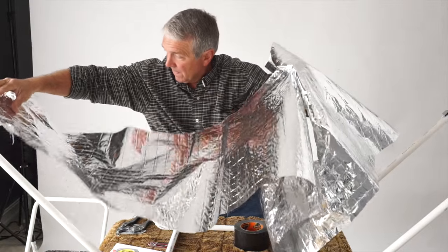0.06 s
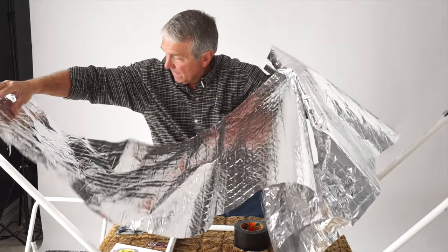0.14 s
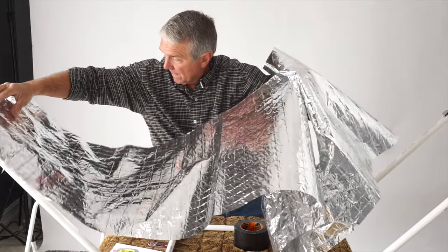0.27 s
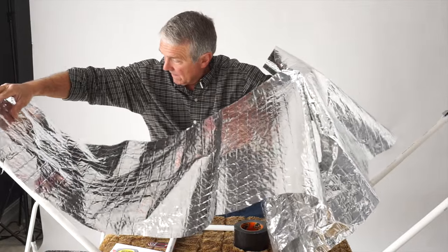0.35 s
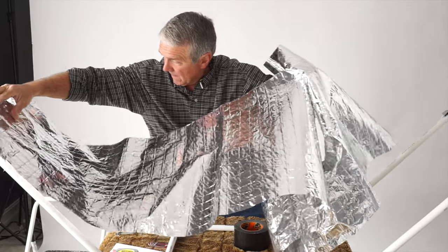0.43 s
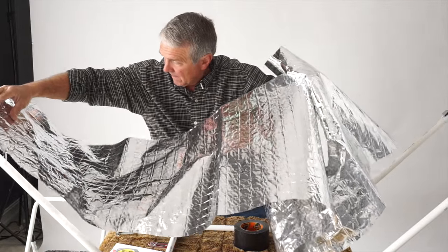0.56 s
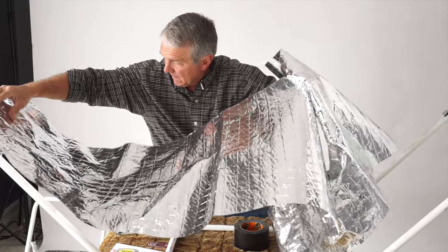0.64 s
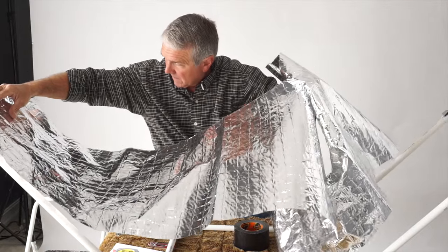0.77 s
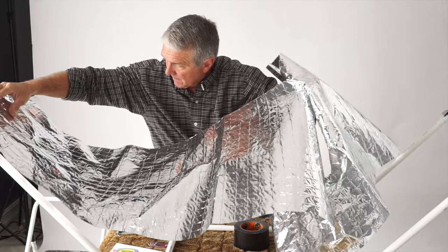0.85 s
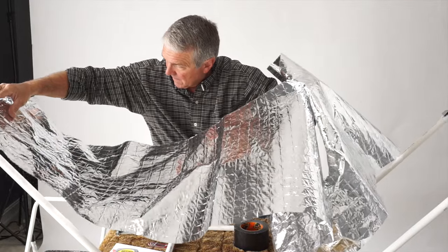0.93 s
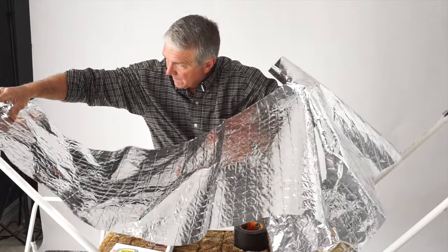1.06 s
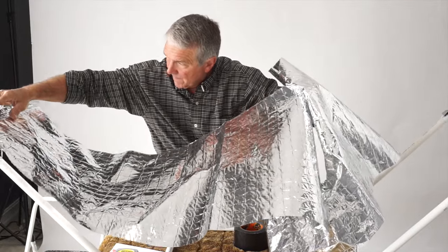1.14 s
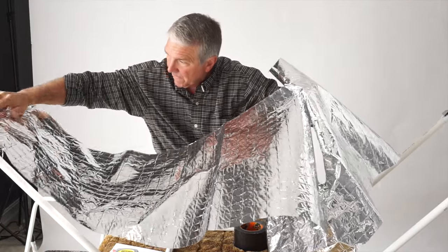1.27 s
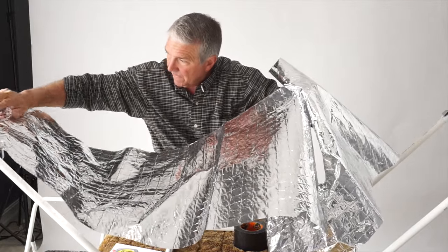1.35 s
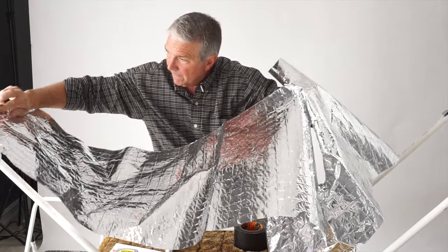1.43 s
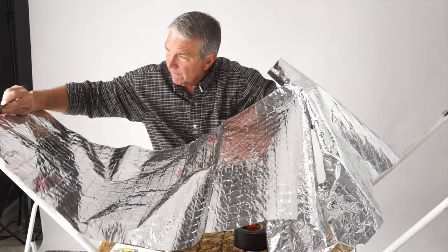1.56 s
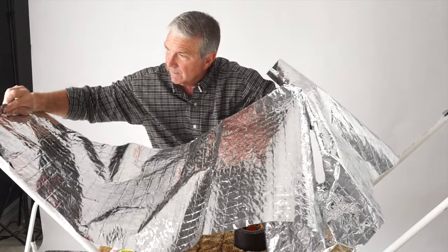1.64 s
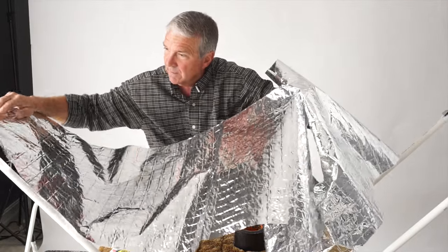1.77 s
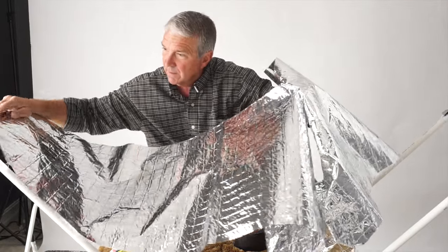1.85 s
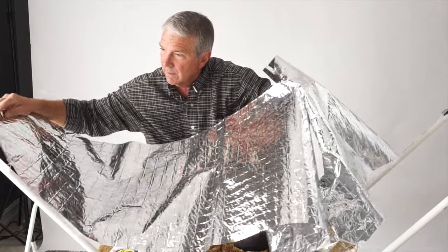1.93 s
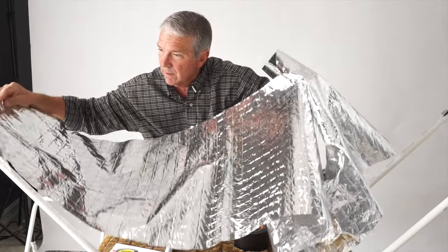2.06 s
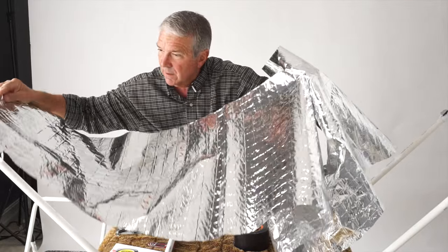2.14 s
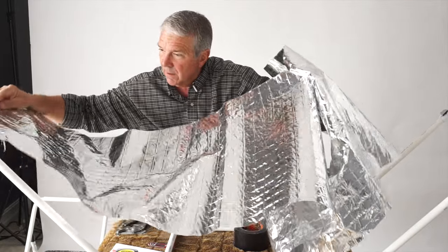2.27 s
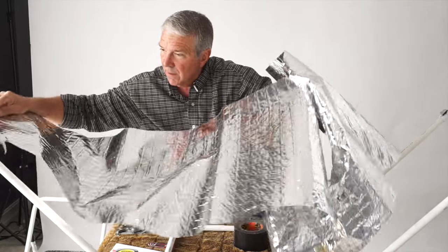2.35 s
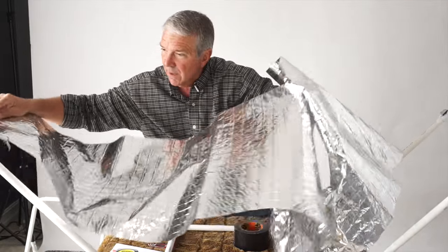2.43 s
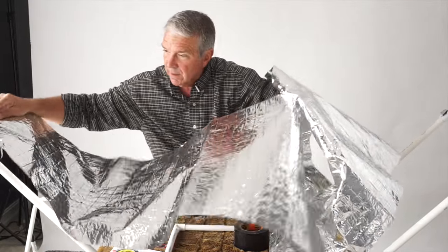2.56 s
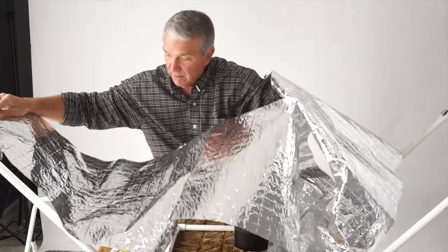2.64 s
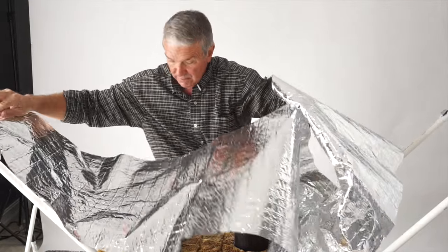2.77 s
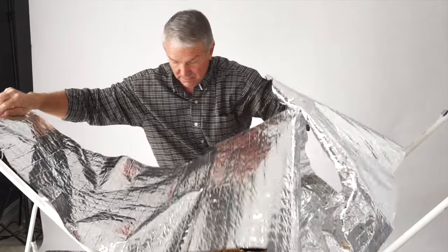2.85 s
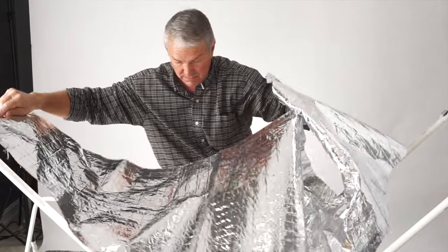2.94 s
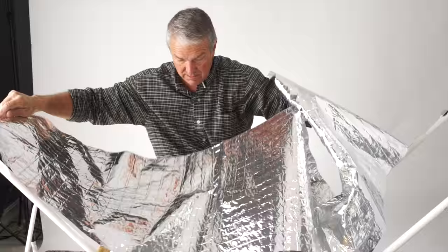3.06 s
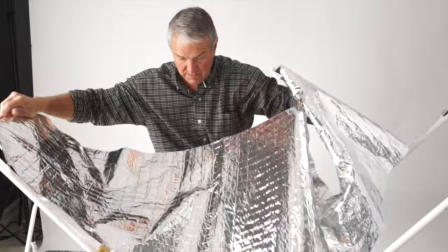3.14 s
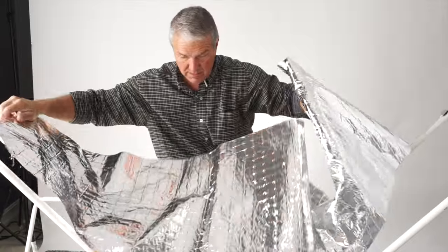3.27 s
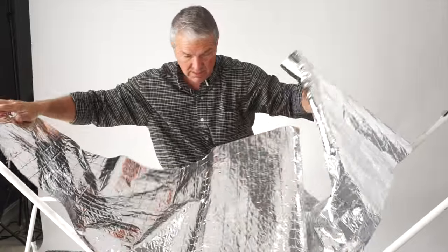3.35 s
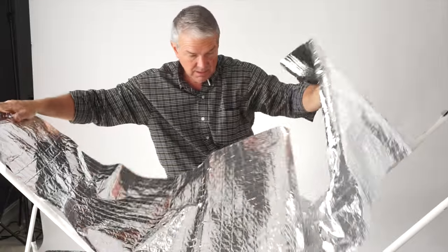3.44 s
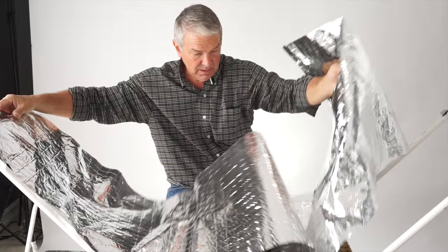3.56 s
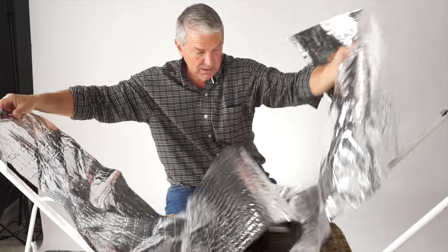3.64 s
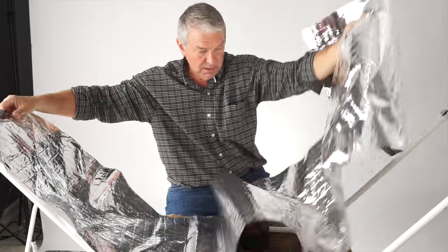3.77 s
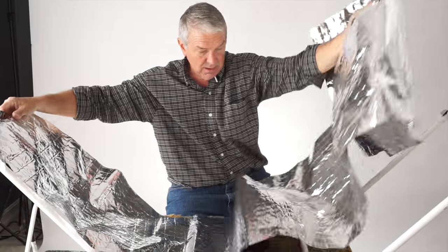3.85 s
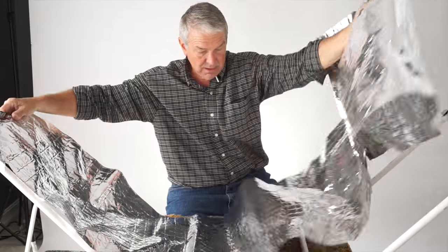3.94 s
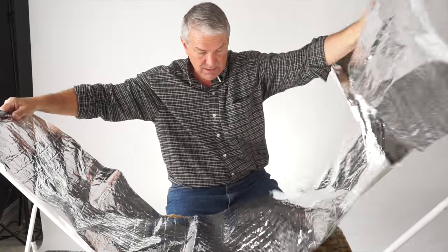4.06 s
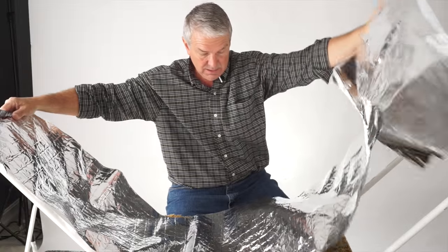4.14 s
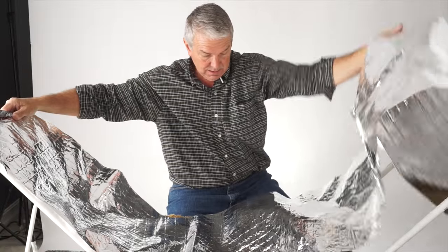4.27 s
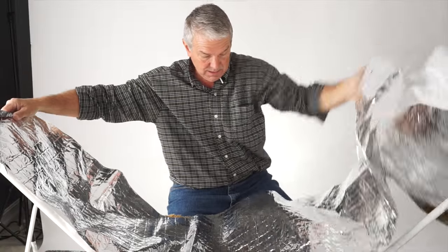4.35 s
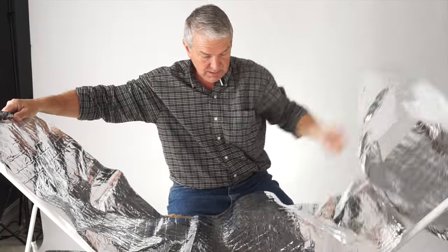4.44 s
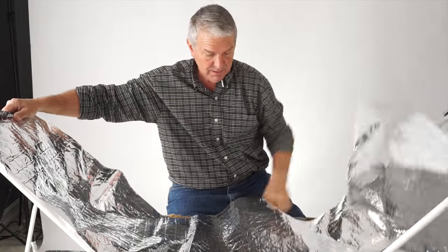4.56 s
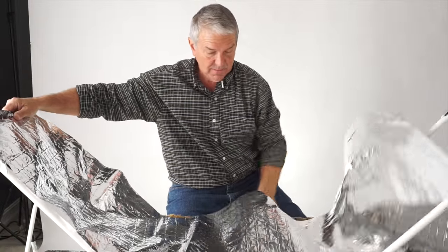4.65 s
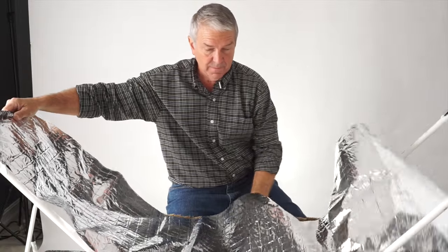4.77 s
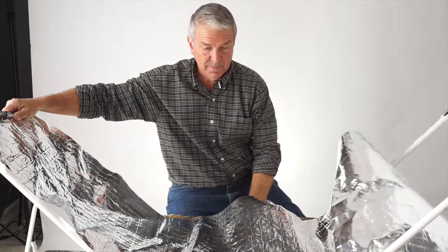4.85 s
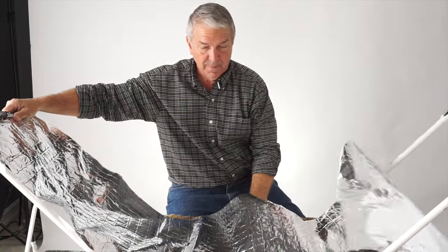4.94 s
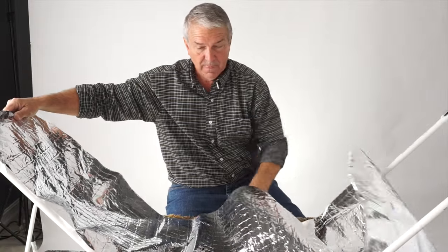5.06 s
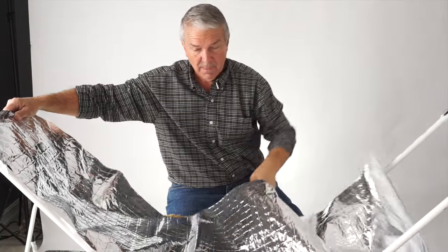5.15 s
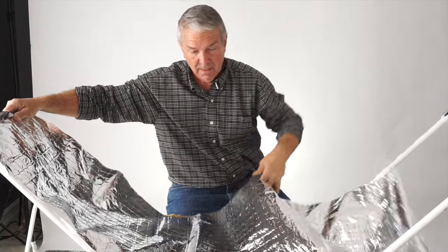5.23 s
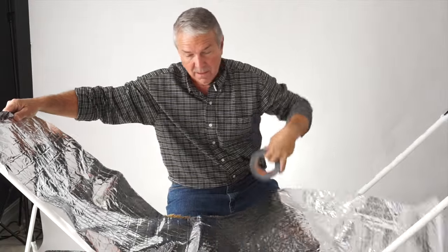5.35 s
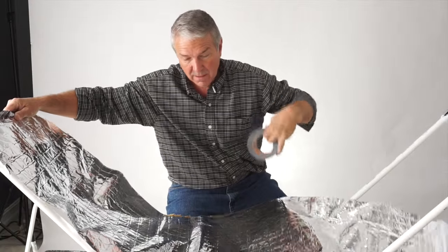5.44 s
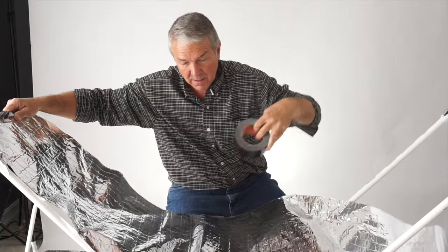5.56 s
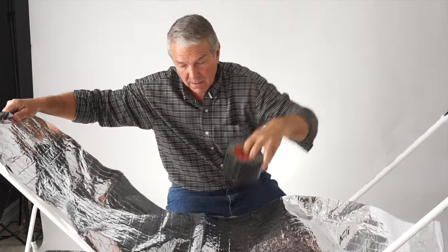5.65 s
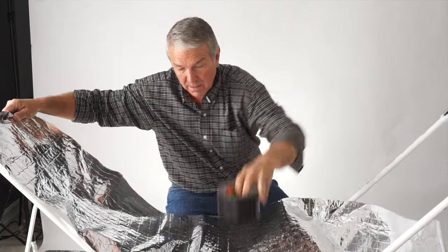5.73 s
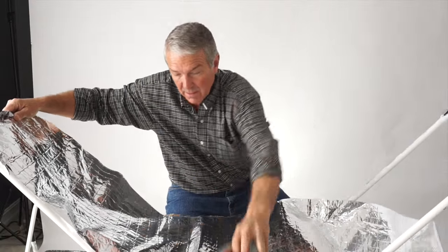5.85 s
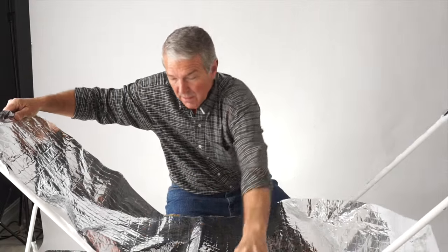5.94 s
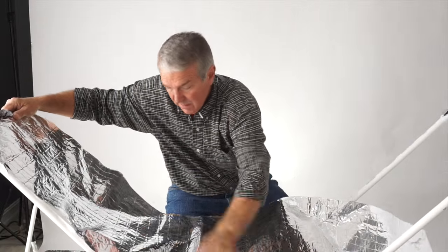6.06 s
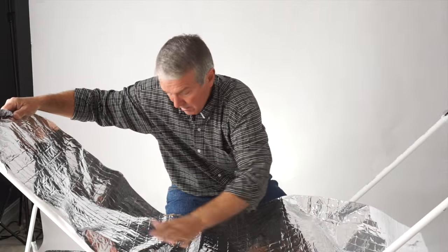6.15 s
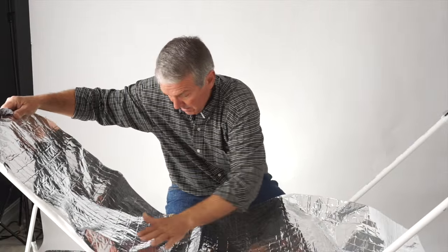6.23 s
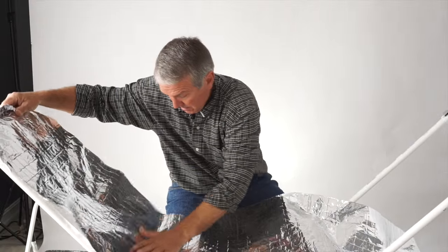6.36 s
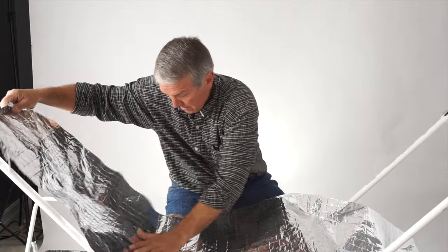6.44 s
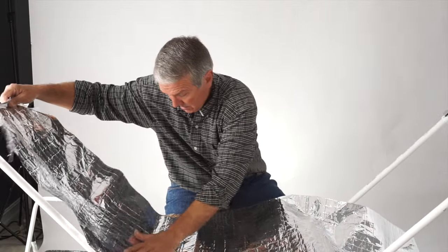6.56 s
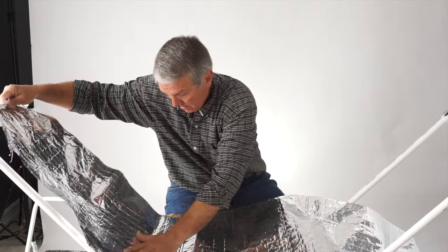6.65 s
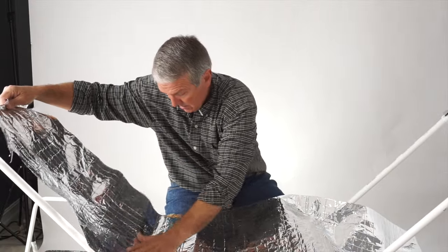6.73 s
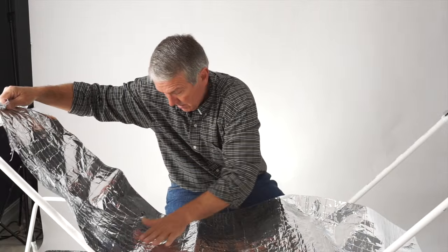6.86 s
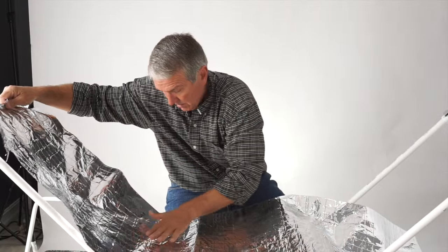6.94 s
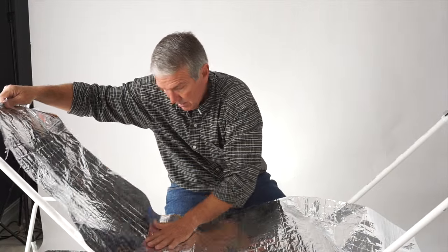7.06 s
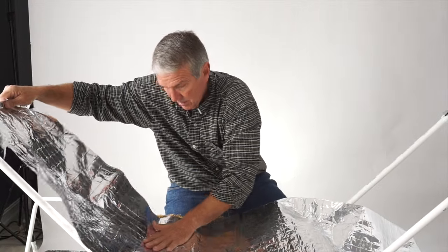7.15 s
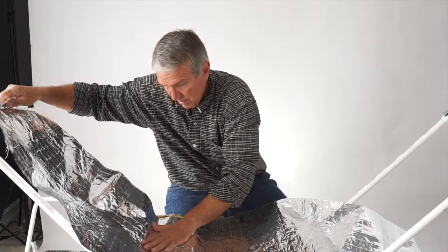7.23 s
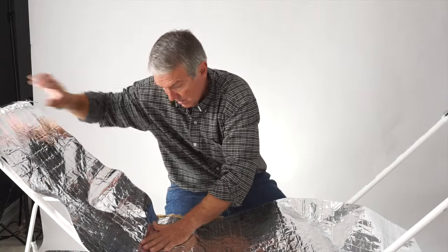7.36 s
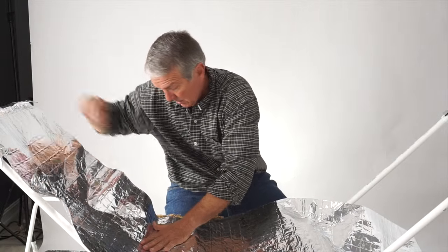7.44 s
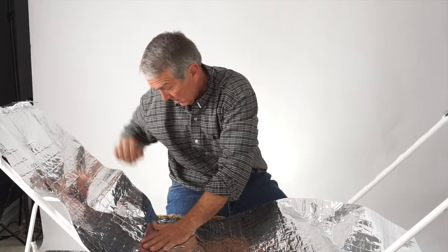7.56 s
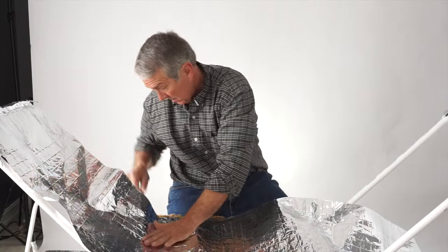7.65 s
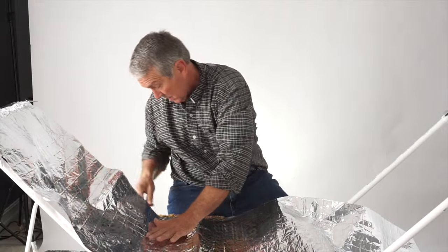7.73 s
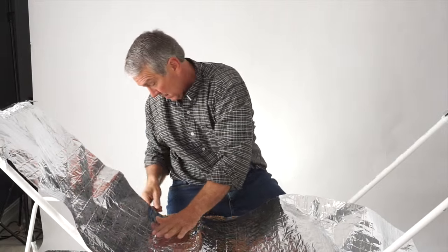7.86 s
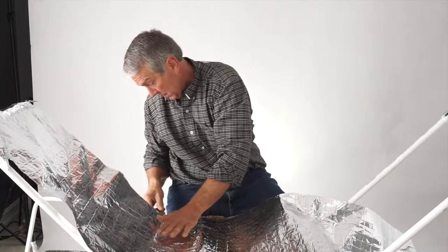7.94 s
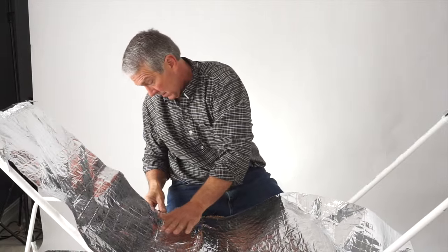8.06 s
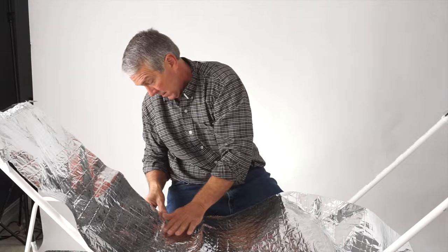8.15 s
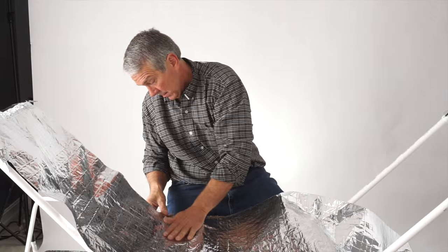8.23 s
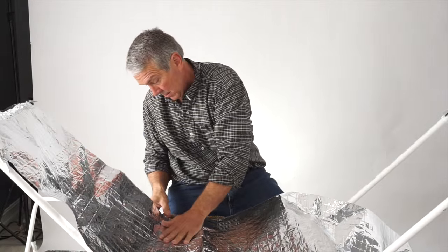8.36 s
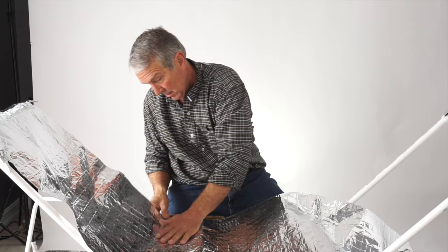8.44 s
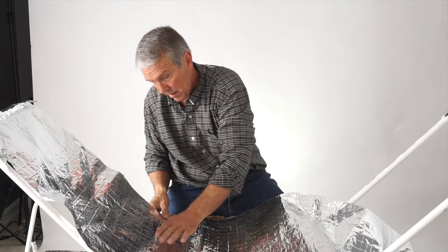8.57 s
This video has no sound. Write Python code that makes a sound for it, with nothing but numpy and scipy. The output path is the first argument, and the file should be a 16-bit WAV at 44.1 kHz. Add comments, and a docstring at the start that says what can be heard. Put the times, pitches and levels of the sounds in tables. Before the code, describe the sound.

Bright foil-like crackling builds to sharp snaps and hissing flutter, then one ringing thud and short crinkly hand rubs in a quiet studio.

```python
"""A big sheet of metallised plastic film is unfolded with tugs and shakes in a quiet studio.
Creases snap in showers of tiny bright clicks, and the panels between them buckle with duller pops.
The sheet is lifted and thrown open, then hisses and flaps as it sinks over a frame.
A roll of tape lands on the table with one ringing thud, then a palm rubs the film flat.
Clicks and pops are short ringing noise bursts; faint still air, made of filtered noise, lies under it all."""
import sys
import numpy as np
from scipy import signal
from scipy.fft import rfft, irfft
from scipy.io import wavfile
from scipy.ndimage import uniform_filter1d

SR = 44100
rng = np.random.default_rng(int(sys.argv[2]) if len(sys.argv) > 2 else 0)


def to_wav(s):
    """Save 16-bit WAV."""
    ch = np.atleast_2d(s).T  # columns
    pcm = np.round(np.clip(ch, -1, 1) * 32767)  # PCM
    wavfile.write(sys.argv[1], SR, pcm.astype(np.int16))


N = 379260
T = np.arange(N) / SR  # time [s]

# colour of the soft, low motion of the whole sheet: (frequency [Hz], level [dB])
FLAP_COLOUR = [(40, -14), (90, -17), (135, -8.5), (170, -4.5), (220, 0.5), (320, -1), (500, 3.5),
               (1200, -32.5)]
# pushes of the palm over the film: (peak time [s], rise [s], fall [s],
# relative crease crackle [dB], relative panel rustle [dB], hollow croak [dB])
PALM_STROKES = [(6.43, 0.043, 0.043, -28.5, -31, -49), (6.55, 0.1, 0.094, -30, -38.5, -45),
                (6.801, 0.056, 0.058, -34.5, -39.5, -50), (6.86, 0.014, 0.022, -43, -52, -46),
                (6.95, 0.047, 0.075, -44, -45.5, -59), (7.1, .035, 0.048, -28.5, -35.5, -37.5),
                (7.23, 0.033, 0.021, -33, -40, -52), (7.3, 0.078, 0.071, -32.5, -43, -49.5),
                (7.54, 0.063, 0.054, -50, -50, -54.5), (7.65, 0.041, 0.048, -36.5, -42, -51.5),
                (7.8, 0.12, 0.078, -40, -46, -57), (8.22, 0.077, 0.078, -50, -47, -56),
                (8.3, 0.036, .03, -38, -42.5, -55), (8.39, 0.047, 0.032, -38.5, -43, -61),
                (8.54, 0.098, 0.055, -42, -44.5, -53)]


def rustle():
    """Slow handling gives separate ticks, each jolting a panel; brisk handling adds a dense wash of small ones."""
    # tightly folded film rings higher than slack or hand-pressed film:
    # (time [s], panel treble minus bass [dB], crease treble minus bass [dB])
    tension = [(0, 1, 2), (1.3, 8.5, 0), (2.7, 2, -1.5), (3.4, 10.5, 4.5), (3.8, 0.5, -1), (4.1, 5, 1.5),
               (5.2, -3.5, -0.5), (5.5, 2.5, -1), (5.9, -11.5, -4), (6.4, 0, 3), (7.35, -4.5, 5),
               (7.8, -2.5, 1), (8.6, -4.5, -3.5)]
    # loose film gliding over itself as it sinks: (time [s], share of the crease sound that is hiss [0-1])
    gliding = [(0, 0), (2.8, 0.22), (3.6, 0.62), (4.1, 0.56), (4.6, 0.38), (5.0, 0.7), (5.35, 0.7),
               (5.9, 0.58), (6.3, 0.18), (8.6, 0)]
    # colours of creases, of panels and of the gliding hiss: (frequency [Hz], level [dB])
    crease_colour = [(500, -41), (1500, 2.5), (3000, -2), (5000, -3), (7500, -3.5), (10000, 0),
                     (13000, 1.5), (15500, 2)]
    panel_colour = [(150, -18), (350, -8.5), (600, -1), (1000, 0.5), (1500, -0.5), (2300, -5), (4000, -8.5),
                    (9000, -16.5)]
    hiss_colour = [(800, -16.5), (2000, 0.5), (4800, -0.5), (6500, -1.5), (8300, -4.5), (10500, 1),
                   (12500, 0), (15500, 4)]

    crease_db, panel_db, flutter_db = handling()
    panel_tilt, crease_tilt = curves(tension)
    brisk = np.clip(.5 + .02 * (crease_db + 40), .22, .75)  # louder crackle counts as brisker

    # ticks and jolts share the same moments: a fold yields and its panel is knocked
    folds = runs(count=400, spread_db=3.6, run_s=.022)
    ticks = shower(*folds, low_hz=4500, high_hz=17800, mean_decay_s=0.00065, q=0.53, size=256)
    small_folds = runs(count=2000, spread_db=1.2, run_s=.005)
    wash = shower(*small_folds, low_hz=2600, high_hz=14900, mean_decay_s=0.0019, q=0.52, size=256)
    jolts = shower(*folds, low_hz=620, high_hz=2900, mean_decay_s=0.0026, q=0.28, size=512)
    small_bends = runs(count=1000, spread_db=0.5, run_s=.012)
    ripples = shower(*small_bends, low_hz=452, high_hz=3220, mean_decay_s=0.0019, q=0.65, size=512)
    sheet_bends = runs(count=250, spread_db=1.0, run_s=.05)
    flutter = shower(*sheet_bends, low_hz=151, high_hz=500, mean_decay_s=0.0046, q=0.6, size=2048)

    creases = unit(colour(blend(ticks, wash, brisk), crease_colour))
    # gliding film trades its ticks for a smooth hiss
    hiss = unit(colour(rng.standard_normal(N), hiss_colour))
    hiss_share = np.clip(curves(gliding)[0], 0, 1)
    creases = blend(creases, hiss, hiss_share)
    panels = unit(colour(blend(jolts, ripples, brisk), panel_colour))
    flutter = unit(colour(flutter, FLAP_COLOUR))
    return (tilt(creases, 5400, crease_tilt) * undb(crease_db - 0.48)
            + tilt(panels, 1430, panel_tilt) * undb(panel_db - 1.02)
            + flutter * undb(flutter_db - 3.0))


def handling():
    """Relative dB of crackle, rustle and flutter; any rustle brings a little flutter, and swinging brings more."""
    # tugs and shakes that unfold the sheet, and its last slumps: (peak time [s], rise [s], fall [s],
    # relative crease crackle [dB], relative panel rustle [dB])
    tugs = [(.04, 0.11, 0.032, -43, -46), (.22, 0.027, 0.055, -45, -49.5), (.37, 0.047, 0.068, -43.5, -48),
            (.55, 0.026, 0.021, -48, -51), (.63, 0.016, 0.028, -45.5, -48), (.78, 0.028, .04, -46, -49.5),
            (.86, .02, .02, -58, -49), (1.05, 0.025, 0.053, -40, -63), (1.13, 0.036, 0.046, -42.5, -43),
            (1.26, 0.032, 0.03, -38, -51), (1.41, 0.14, 0.098, -41, -46),
            (1.66, 0.087, 0.091, -45.5, -49.5), (1.79, 0.027, 0.066, -36.5, -46.5),
            (2.07, 0.082, 0.078, -33, -39.5), (2.31, 0.046, 0.13, -33.5, -42.5),
            (2.49, .02, 0.043, -43, -40), (2.62, 0.083, 0.17, -34.5, -40), (2.95, 0.063, 0.11, -36.5, -39),
            (3.14, .1, 0.22, -36.5, -40), (5.84, .07, 0.08, -42, -49), (6.07, 0.032, 0.066, -41, -43.5),
            (6.15, 0.082, 0.11, -42, -57)]
    # wide swings as the sheet is lifted, thrown open and sinks: (peak time [s], rise [s], fall [s],
    # relative crease crackle [dB], relative panel rustle [dB], relative flutter [dB])
    swings = [(3.43, 0.09, 0.074, -27.5, -29, -46), (3.74, 0.14, 0.12, -27.5, -31, -51.5),
              (4.13, 0.21, 0.14, -34, -36.5, -71), (4.36, 0.058, 0.045, -36.5, -34, -44),
              (4.5, 0.073, 0.16, -30.5, -33.5, -39.5), (4.73, 0.12, 0.089, -27, -34, -48),
              (4.91, 0.03, .03, -32, -37, -48.5), (5.04, 0.055, .06, -30, -40, -55),
              (5.18, 0.091, 0.091, -29.5, -38, -51), (5.42, 0.13, 0.14, -30.5, -39, -66)]
    rest_crease_db, rest_panel_db = -58.5, -54.5  # the held sheet is never quite still
    # flutter beside a rustle of -40 dB, and the dB it gains per dB of rustle
    flutter_floor_db, flutter_follow = -54.5, 0.42

    moves = [*tugs, *swings, *PALM_STROKES]
    crease = movements(moves, column=3) + undb(rest_crease_db) ** 2
    panel = movements(moves, column=4) + undb(rest_panel_db) ** 2
    stir = panel / undb(-40) ** 2
    flutter = movements(swings, column=5) + undb(flutter_floor_db) ** 2 * stir ** flutter_follow
    return 10 * np.log10([crease, panel, flutter])


def movements(rows, column):
    """Summed power of one level column; each movement gathers speed up to its peak, then dies away."""
    swell_shape = 1.74  # 1 = pointed swell, 2 = bell
    t = T[::100]  # hands move slowly, so a coarse time grid is enough
    power = 0
    for row in rows:
        peak_s, rise_s, fall_s = row[:3]
        distance = np.abs((t - peak_s) / np.where(t < peak_s, rise_s, fall_s))
        power = power + undb(row[column]) ** 2 * np.exp(-distance ** swell_shape)
    return np.interp(T, t, power)


def snaps():
    """A crease flips with a bright crack, then the film around it shivers for a few milliseconds."""
    # single loud crease snaps: (time [s], relative level [dB], ring of the crack [Hz])
    crease_snaps = [(0.0348, -23.5, 12400), (0.057, -24, 12000), (0.1845, -25.5, 10500),
                    (0.208, -28, 11200), (0.2229, -26, 8200), (0.255, -27.5, 3300), (0.2852, -22, 14300),
                    (0.295, -19.5, 13600), (0.3607, -27, 10400), (0.385, -25.5, 10800),
                    (0.625, -25.5, 7400), (0.7004, -22.5, 11400), (0.7843, -25, 9850), (0.9832, -24, 11100),
                    (1.054, -24, 9800), (1.2183, -21, 11700), (1.4506, -25.5, 3740), (1.7822, -23.5, 4760),
                    (1.9604, -25, 10100), (2.0074, -22, 11300), (2.082, -20.5, 4300), (2.14, -20.5, 4440),
                    (2.2104, -22.5, 3080), (2.4156, -17, 14200), (2.472, -20, 5500), (2.546, -20, 10200),
                    (2.5629, -9.5, 14100), (2.6287, -14.5, 10200), (2.6948, -18.5, 14000),
                    (2.9118, -21, 13920), (2.928, -17, 14200), (3.1318, -19, 10200), (3.3012, -8.5, 13300),
                    (3.4336, -6, 13300), (4.4395, -18, 13800), (4.7275, -10, 13500), (4.806, -15, 12600),
                    (4.9162, -15.5, 13600), (5.1695, -13, 13100), (5.3428, -12.5, 13000),
                    (5.3675, -17, 11700), (6.332, -29, 12300), (6.6228, -17.5, 13200), (6.6714, -19, 12700),
                    (6.7846, -22, 12000), (6.871, -25.5, 8900), (6.9393, -18.5, 14600),
                    (7.0217, -19, 10500), (7.232, -16.5, 11100), (7.3914, -21, 13000), (7.443, -26, 14300),
                    (7.4837, -21, 13500), (7.5155, -25, 9860), (7.5264, -28, 9850), (7.535, -24, 12700),
                    (7.7668, -17, 11600), (7.8248, -17.5, 15200), (7.868, -23, 10200), (7.9793, -27, 14900),
                    (8.015, -26, 9770), (8.1276, -36, 13800), (8.204, -32, 5900), (8.2838, -25, 5640)]
    s, db, hz = np.transpose(crease_snaps)
    crack = pops(hz, decay_s=0.00032, q=2.4, size=512) * undb(-17.5)
    shiver = pops(hz * 0.5, decay_s=0.0031, q=0.097, size=512) * undb(-19.0)
    return place(s, undb(db)[:, None] * (crack + shiver))


def buckles():
    """A taut panel pops through with a papery knock, and the creases along its rim crackle with it."""
    # single panels popping through: (time [s], relative level [dB], ring of the knock [Hz])
    panel_pops = [(0.06, -43, 840), (.543, -44, 2000), (.701, -46, 1710), (1.023, -40, 1380),
                  (1.259, -39.5, 1520), (1.883, -36.5, 980), (2.473, -37.5, 696), (2.929, -31, 1520),
                  (3.302, -35, 1750), (3.429, -29, 1330), (3.723, -27, 1080), (3.781, -33, 1260),
                  (3.837, -31.5, 1370), (4.363, -32.5, 1000), (4.537, -29.5, 960), (4.918, -30.5, 900),
                  (6.333, -47, 800), (6.555, -33, 760), (6.872, -36, 670), (6.982, -40.5, 625),
                  (7.831, -42, 935)]
    s, db, hz = np.transpose(panel_pops)
    knock = pops(hz, decay_s=0.0049, q=0.64, size=2048) * undb(-5.0)
    rim = pops(hz * 5, decay_s=0.0052, q=0.15, size=2048) * undb(-10)
    return place(s, undb(db)[:, None] * (knock + rim))


def flaps():
    """The sheet catches the air and is pulled up short: soft, low pops of the whole film."""
    # soft flaps of the whole sheet: (time [s], relative level [dB], ring [Hz])
    sheet_flaps = [(.031, -45, 178), (1.881, -47.5, 240), (2.472, -41.5, 265), (4.442, -39, 170),
                   (4.522, -35.5, 220), (4.669, -31.5, 198), (4.7, -31.5, 295), (7.223, -45.5, 170)]
    s, db, hz = np.transpose(sheet_flaps)
    puffs = undb(db - 7)[:, None] * pops(hz, decay_s=0.0061, q=0.81, size=4096)
    return colour(place(s, puffs), FLAP_COLOUR)


def palm():
    """The palm sticks and slips on the film, which croaks over its hollow."""
    # hollow of the film under the palm: (frequency [Hz], level [dB])
    hollow_colour = [(200, -11), (450, -5.5), (620, 0.5), (800, 3), (1050, -4), (1600, -11), (4000, -40)]
    slip_runs = runs(count=700, spread_db=4.5, run_s=0.016)
    slips = shower(*slip_runs, low_hz=545, high_hz=1000, mean_decay_s=0.0018, q=0.98, size=512)
    push = np.sqrt(movements(PALM_STROKES, column=5))  # power to gain
    return unit(colour(slips, hollow_colour)) * push


def thud():
    """The tape roll pushes softly on the table, whose modes ring out; the room answers with a low boom."""
    # the tape roll lands: (time [s], relative level [dB])
    landing_s, landing_db = (6.027, -12)
    # table and room ringing under it: (frequency [Hz], relative level [dB], time to fall by 60 dB [s])
    table_modes = [(142.7, -22, 0.5), (162, -8, 0.11), (211, -23, 0.51), (268, 16, 0.017), (310, -20, 0.26),
                   (361, -13, 0.11), (415, -40, 0.2)]
    t = np.maximum(T - landing_s, 0)
    ring = sum(undb(db - 60 * t / t60) * np.sin(2 * np.pi * hz * t) for hz, db, t60 in table_modes)
    soft_push = 1 - np.exp(-t / 0.0047)
    knock = signal.sosfilt(signal.butter(2, 115, "high", fs=SR, output="sos"), ring * soft_push)
    boom_band = signal.butter(3, [135, 400], "band", fs=SR, output="sos")
    diffuse = unit(signal.sosfilt(boom_band, rng.standard_normal(N)))
    boom = diffuse * undb(-20.0 - 60 * t / .5) * (1 - np.exp(-t / .008))
    return undb(landing_db) * (knock + boom)


def studio(x, low_t60, high_t60, count):
    """Diffuse wall reflections, treble dying first; each short slice of sound takes one echo path at random."""
    t = T[:SR // 2]
    path = rng.integers(0, count, N // 256 + 1)[np.arange(N) // 256]
    wet = 0
    for k in range(count):
        noise = rng.standard_normal(len(t))
        low = signal.sosfilt(signal.butter(1, 2500, fs=SR, output="sos"), noise)
        high = .4 * (noise - low)
        tail = low * undb(-60 * t / low_t60) + high * undb(-60 * t / high_t60)
        tail = tail * (t > .004)  # the walls answer after a short gap
        share = uniform_filter1d(1. * (path == k), size=256)  # smooth joins between slices
        wet = wet + signal.fftconvolve(x * share, unit(tail) / np.sqrt(len(t)))[:N]
    return wet


def still_air():
    """The faint, steady noise of the quiet room: random noise with a fixed colour."""
    # colour of the still room: (frequency [Hz], level [dB])
    air_colour = [(25, -39), (60, -42), (140, -7.5), (300, -5.5), (1000, -23), (4000, -8), (15000, -11)]
    return unit(colour(rng.standard_normal(N), air_colour)) * undb(-56.5)


def runs(count, spread_db, run_s):
    """Times and gains of pops in runs of four, as one yielding fold trips its neighbours; many small, few large."""
    when, force = np.repeat(rng.random((count, 2)), repeats=4, axis=0).T  # shared by the four
    starts = (np.arange(len(when)) // 4 + when) * N / SR / count
    delay, own = rng.random((len(when), 2)).T
    gain = undb(-spread_db * np.log((own + .03) * np.sqrt(force + .03)))
    return (starts + run_s * delay) % (N / SR), gain


def shower(times, gain, low_hz, high_hz, mean_decay_s, q, size):
    """Each pop rings a facet of its own size and damping; the slow level is held close to 1."""
    facet, damping = rng.random((len(times), 2)).T
    ring_hz = low_hz * (high_hz / low_hz) ** facet
    x = place(times, gain[:, None] * pops(ring_hz, mean_decay_s * (.5 + damping), q, size))
    return x / np.sqrt(uniform_filter1d(x ** 2, size=4500) + 1e-9)


def pops(ring_hz, decay_s, q, size):
    """One row per pop: a burst that dies fast, ringing in the broad resonance of its own facet of film."""
    t = np.arange(size) / SR
    burst = rng.standard_normal((len(ring_hz), size)) * np.exp(-t / np.reshape(decay_s, (-1, 1)))
    ratio = (np.arange(size // 2 + 1) + .5) * SR / size / ring_hz[:, None]
    resonance = 1 / (1 + 1j * q * (ratio - 1 / ratio)) ** 2
    return unit(irfft(rfft(burst) * resonance))


def place(times, sounds):
    """Sum short sounds at their times."""
    index = np.maximum(times * SR, 0).astype(int)[:, None] + np.arange(sounds.shape[1])
    return np.bincount(index.ravel(), sounds.ravel(), N)[:N]


def colour(x, points):
    """Filter that shapes the spectrum by (frequency [Hz], level [dB]) points without ringing ahead of a sound."""
    hz, db = np.transpose(points)
    size = 4096
    bin_hz = np.arange(size // 2 + 1) * SR / size
    gain = undb(np.interp(np.log(bin_hz + 1), np.log(hz), db))
    # folding the cepstrum onto its first half gives a minimum-phase filter
    cepstrum = irfft(np.log(gain))
    cepstrum[1:size // 2] *= 2
    cepstrum[size // 2 + 1:] = 0
    return signal.oaconvolve(x, irfft(np.exp(rfft(cepstrum))))[:N]


def tilt(x, hz, db):
    """See-saw the spectrum about hz: db is treble minus bass."""
    low = signal.sosfiltfilt(signal.butter(2, hz, fs=SR, output="sos"), x)
    return (low + (x - low) * undb(db)) / np.sqrt((1 + undb(2 * db)) / 2)


def blend(a, b, share):
    """Mix at equal power; share is that of b."""
    return np.sqrt(1 - share) * a + np.sqrt(share) * b


def curves(table):
    """Columns of a table joined by straight lines in time."""
    s, *columns = np.transpose(table)
    return [np.interp(T, s, c) for c in columns]


def unit(x):
    """Scale each row to rms 1."""
    return x / np.sqrt(np.mean(x ** 2, axis=-1, keepdims=True) + 1e-20)


def undb(db):
    """Decibels to gain."""
    return 10 ** (np.asarray(db) / 20)


def scene():
    """Film and tape roll in the room, over faint still air."""
    film = rustle() + snaps() + buckles() + flaps() + palm()
    walls = undb(-12) * studio(film, low_t60=.4, high_t60=.25, count=4)
    return (film + walls + thud() + still_air())[None]


def record(dry):
    """The microphone sheds the deep bass; the top is cut steeply."""
    top_hz = 15420
    x = signal.sosfilt(signal.butter(3, 105, "high", fs=SR, output="sos"), dry)
    return signal.sosfilt(signal.ellip(12, .2, 70, top_hz, fs=SR, output="sos"), x)


dry = scene()
out = record(dry)
to_wav(out)
```